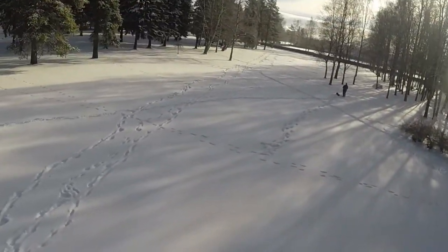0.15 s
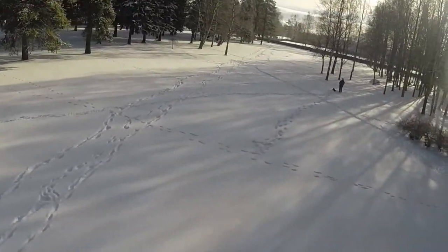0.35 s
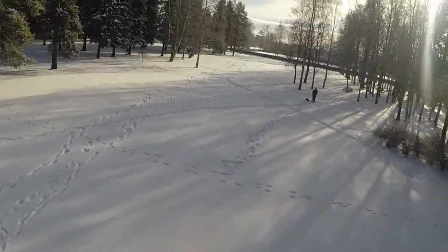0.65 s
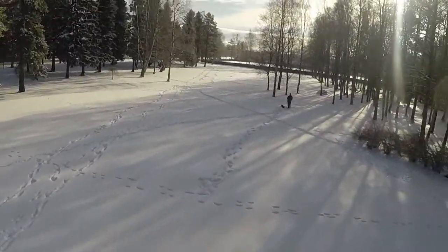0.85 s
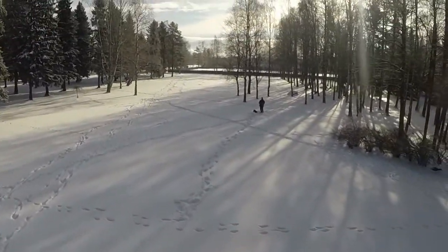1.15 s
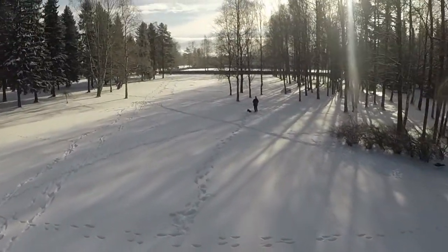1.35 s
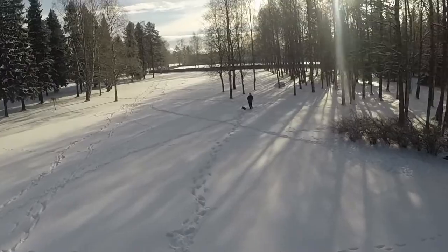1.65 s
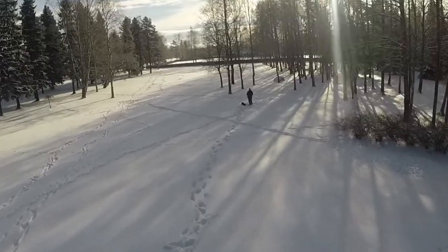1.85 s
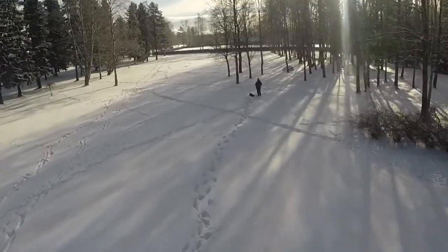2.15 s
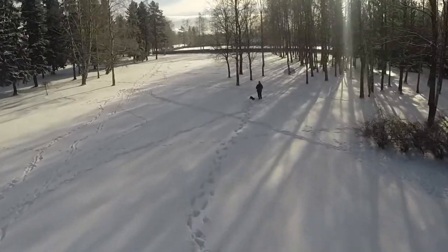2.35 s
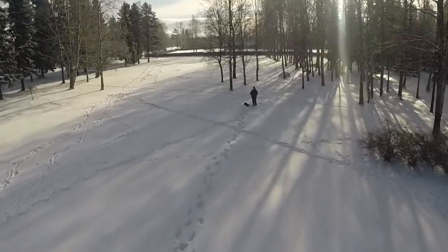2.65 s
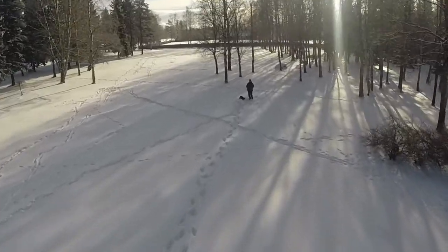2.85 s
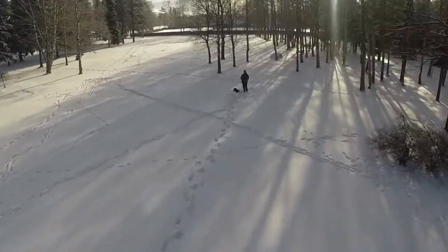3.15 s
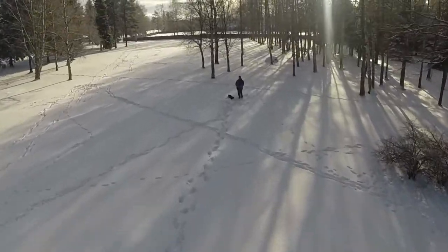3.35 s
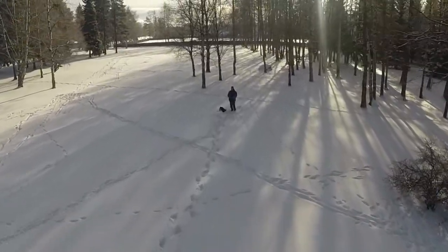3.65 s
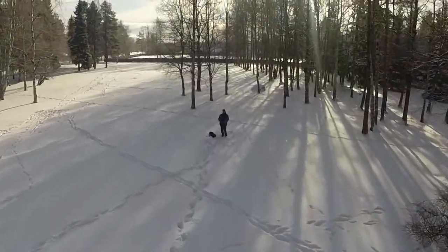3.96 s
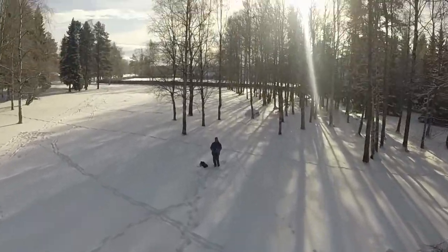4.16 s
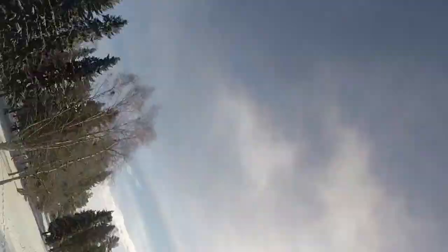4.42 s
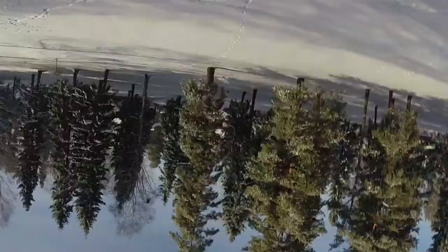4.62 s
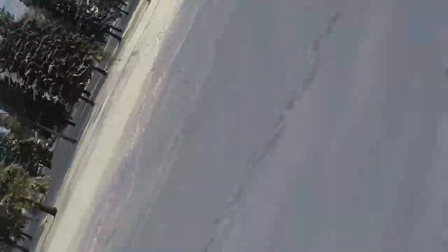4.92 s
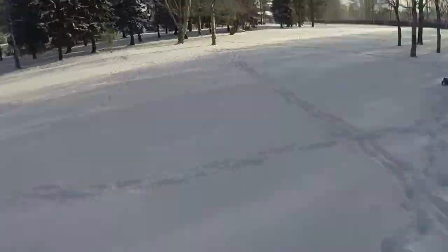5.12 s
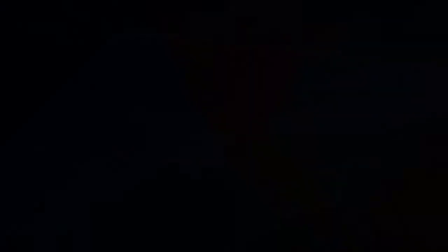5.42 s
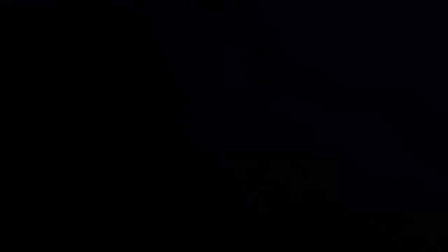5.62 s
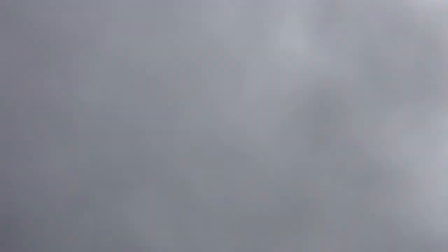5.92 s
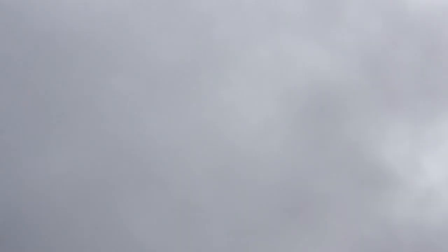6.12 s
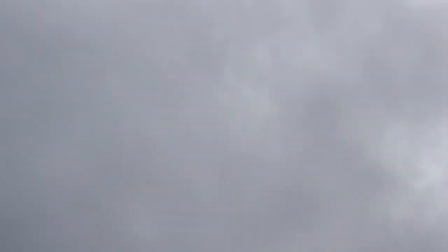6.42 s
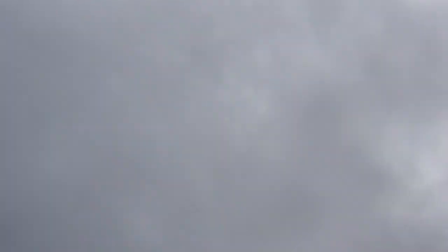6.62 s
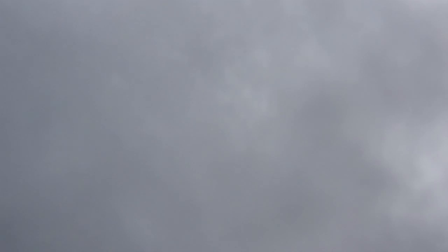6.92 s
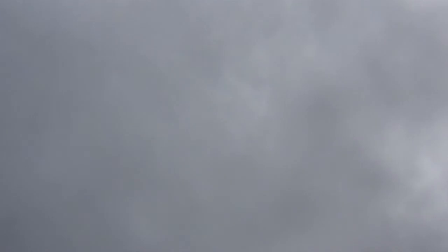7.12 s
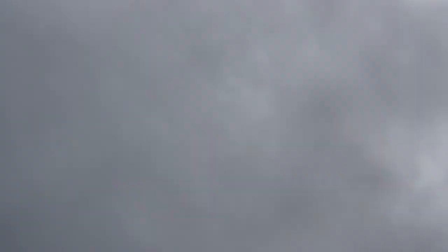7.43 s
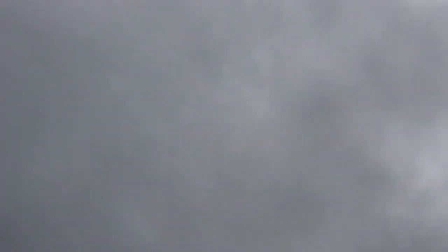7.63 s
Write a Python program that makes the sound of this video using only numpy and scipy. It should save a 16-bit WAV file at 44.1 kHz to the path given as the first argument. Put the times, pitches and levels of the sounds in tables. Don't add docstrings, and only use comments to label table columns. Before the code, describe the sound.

A loud four-rotor buzz cuts out, a blade rattles on the tumbling housing, then thump, snow crunch, a brief motor shudder and quiet hiss.

```python
import sys
import numpy as np
from scipy import signal
from scipy.fft import rfft, irfft, next_fast_len
from scipy.io import wavfile

SR = 44100
rng = np.random.default_rng(int(sys.argv[2]) if len(sys.argv) > 2 else 0)


def dump_mix(stems):
    frames = np.atleast_2d(stems).T
    limited = np.clip(frames, -1, 1)
    pcm = np.round(limited * 32767).astype(np.int16)
    wavfile.write(sys.argv[1], SR, pcm)


def rack_gain(trim_db):
    fader = np.asarray(trim_db, float)
    return 10 ** (fader / 20)


N = 343098
T = np.arange(N) / SR
POWERED = np.clip((4.38 - T) / 0.033, 0, 1)

# (time [s], hiss level [dB])
WASH = [(0, -29.5), (0.3, -28), (0.6, -29.5), (1.0, -28.5), (1.5, -31), (2.3, -33), (4.36, -35.5),
        (4.5, -39.5), (4.83, -55), (4.87, -51.5), (4.94, -59), (5.04, -57), (5.12, -57), (5.25, -58),
        (5.39, -60.5)]
# (time [s], peak [dB], panel ring [Hz], tick level [dB])
BLADE_STRIKES = [(4.5150, -15.5, 1135, -52), (4.5172, -15.5, 1102, -50), (4.5226, -10, 1190, -50.5),
                 (4.5410, -8, 1508, -39.5), (4.5455, -22.5, 1500, -40), (4.5500, -5.5, 1950, -37.5),
                 (4.5537, -16.5, 1910, -9), (4.5580, -1.5, 1947, -30), (4.5615, -17.5, 1893, -22.5),
                 (4.5771, -6.5, 1420, -34), (4.5825, -20.5, 1500, -35.5), (4.5858, 3, 1689, -30),
                 (4.5935, -10, 1710, -29), (4.6000, -16.5, 1390, -40.5), (4.6058, -5, 1720, -34.5),
                 (4.6147, -9, 1737, -34.5), (4.6250, -13.5, 1640, -26.5), (4.6295, -14, 1500, -30.5),
                 (4.6348, -9.5, 1650, -35.5), (4.6428, -12.5, 1416, -40.5), (4.6645, -4.5, 1500, -30.5),
                 (4.6768, 1, 1675, -32.5), (4.686, -19.5, 1450, -38), (4.6960, -8.5, 1443, -36.5),
                 (4.7069, -4, 1654, -36), (4.7190, -8.5, 1480, -34.5), (4.7367, -5.5, 1420, -33.5),
                 (4.7493, -2.5, 1500, -34.5), (4.7597, -6.5, 1500, -37), (4.7709, -5, 1527, -35),
                 (4.7893, -7, 1500, -33.5), (4.8009, -3.5, 1524, -35.5), (4.8121, -6, 1500, -38),
                 (4.8314, -6, 1500, -32.5)]


def in_time(rows, fade_s=0.035):
    s, *columns = np.transpose(rows)
    since_start = T - s[0] + (s[0] < .01)
    gate = np.clip(np.minimum(since_start, s[-1] - T) / fade_s + 1, 0, 1)
    return gate, [np.interp(T, s, c) for c in columns]


def lift_db(modes, hz):
    return sum(db / (1 + (2 * (hz - centre_hz) / width) ** 2) for centre_hz, width, db in modes)


def colour(x, spectrum, modes=()):
    size = next_fast_len(N)
    hz = np.maximum(np.fft.rfftfreq(size, 1 / SR), 1)
    points = np.array(spectrum)
    shape_db = np.interp(np.log(hz), np.log(points[:, 0]), points[:, 1], left=-90, right=-120)
    out = irfft(rfft(x, size) * rack_gain(shape_db + lift_db(modes, hz)), size)[:N]
    return out / out.std()


def drift(rate):
    r = np.exp(-80 * np.pi * rate / SR)
    slow = signal.lfilter([1], [1, -2 * r, r * r], rng.standard_normal(N // 40 + 2002))[2000:]
    return np.interp(np.arange(N) / 40, np.arange(len(slow)), slow / slow.std())


def ring(clicks, hz, t60):
    r, w = rack_gain(-60 / (t60 * SR)), 2 * np.pi * hz / SR
    return signal.lfilter([0, np.sin(w)], [1, -2 * r * np.cos(w), r * r], clicks + 1e-18)


def swell(s, db, rise, fade):
    return rack_gain(db - np.where(T < s, rise * (s - T), fade * (T - s)))


def preamp_hiss():
    # (frequency [Hz], density [dB per Hz])
    hiss_floor = [(20, -4), (60, 1), (150, -1.5), (400, -6.5), (1000, -12), (3000, -16.5), (6000, -22.5),
                  (8000, -26.5), (12000, -30), (15800, -56)]
    # (time [s], level [dB])
    gain_recovery = [(6.3, -7.5), (6.95, 1.3)]
    level_db = -62 + np.interp(T, *np.transpose(gain_recovery))
    return rack_gain(level_db) * colour(rng.standard_normal(N), hiss_floor)


def stall():
    # (time [s], level [dB])
    shudder = [(6.25, -55), (6.43, -45.5), (6.52, -30.5), (6.63, -35), (6.73, -48.5), (6.84, -44.5),
               (6.93, -50.5), (7.3, -62), (7.6, -75.5)]
    # (time [s], third overtone [dB], rattle [dB])
    shaft_catches = [
        (6.3, -60, -56),
        (6.42, -55, -62),
        (6.53, -44.5, -68),
        (6.68, -50, -51.5),
        (6.845, -47.5, -76),
    ]
    catch_db_per_s = 280
    gate, (db,) = in_time(shudder)
    phase = 2 * np.pi * 62 * T
    third = sum(swell(s, third_db, catch_db_per_s, catch_db_per_s) for s, third_db, _ in shaft_catches)
    rattle = sum(swell(s, rattle_db, catch_db_per_s, catch_db_per_s) for s, _, rattle_db in shaft_catches)
    rumble = colour(rng.standard_normal(N), [(20, -9), (40, 8), (130, 2), (260, -22), (500, -23.0)])
    tones = rack_gain(db) * (np.sin(phase) + 0.032 * np.sin(2 * phase) + 0.22 * rumble)
    tones += third * np.sin(2.95 * phase + drift(11))
    tones += rattle * np.sin(2 * np.pi * 288 * T + drift(8.2))
    return gate * np.sqrt(2) * tones


def snow():
    # (start [s], fullest [s], slowing [s], stop [s], crunch level [dB])
    snow_slides = [
        (5.47, 5.68, 5.8, 5.84, -35),
        (5.84, 5.875, 6.01, 6.1, -33),
        (6.03, 6.095, 6.122, 6.135, -46),
        (6.12, 6.155, 6.185, 6.2, -53),
        (6.17, 6.195, 6.22, 6.255, -52),
        (6.24, 6.29, 6.325, 6.36, -67),
        (6.36, 6.385, 6.41, 6.47, -68),
    ]
    # (from [s], to [s], level [dB])
    snow_crushes = [
        (5.405, 5.422, -45),
        (5.42, 5.426, -24),
        (5.427, 5.435, -13),
        (5.443, 5.455, -15),
        (5.457, 5.492, -45),
        (5.742, 5.769, -34),
        (5.76, 5.789, -25.5),
        (5.274, 5.303, -56.5),
    ]
    # (time [s], level [dB], fade [dB per s])
    digging_in = [
        (5.448, -15, 498),
        (5.5, -33, 150),
        (5.54, -29, 250),
        (5.58, -27.5, 62.5),
        (5.76, -31.5, 129),
        (6.13, -52, 46.5),
    ]
    # (frequency [Hz], density [dB per Hz])
    crunch_spectrum = [(700, -15), (900, -17), (1300, -5.5), (1700, 3.5), (2500, -2), (3300, -8),
                       (4000, -11), (4800, -20.5), (6000, -17.5), (7000, -22), (9000, -26.5), (12000, -25),
                       (15800, -74)]
    # (frequency [Hz], density [dB per Hz])
    rub_spectrum = [(8.8, -36.5), (15, -3.5), (123, -4.5), (183, 0), (276, -13), (333, -9.5), (567, -12.5),
                    (771, -31), (900, -33.5), (1170, -58), (1980, -120)]

    edge = -21
    sliding = 0
    for start, fullest, slowing, stop, db in snow_slides:
        shape_db = np.interp(T, [start, fullest, slowing, stop], [edge, 0, 0, edge], left=-99, right=-99)
        sliding = sliding + rack_gain(db + shape_db)
    digging = sum(swell(s, db, rise=650, fade=fade) for s, db, fade in digging_in)
    digging = digging * np.clip((6.5 - T) / .05, 0, 1)

    sizes = rack_gain(3.5 * np.minimum(rng.exponential(1, N), 4)) * rng.choice([-1, 1], N)
    breaks = sizes * (rng.random(N) < 5000 / SR)
    grains = colour(breaks + 0.12 * rng.standard_normal(N), crunch_spectrum,
                    [(2670, 230, 5.1), (4000, 600, 5.5), (5900, 1300, 11.0)])
    pressed = sum(rack_gain(db) * np.clip(np.minimum(T - a, b - T) / 0.0051, 0, 1) for a, b, db in snow_crushes)
    crunch = (sliding * rack_gain(0.04 + 1.8 * drift(60) + 0.6 * drift(10)) + pressed) * grains
    rub_gain = np.maximum(digging, sliding * rack_gain(2.5)) * rack_gain(drift(27))
    return crunch + rub_gain * colour(rng.standard_normal(N), rub_spectrum)


def thumps():
    # (time [s], level [dB], frequency [Hz], t60 [s], direction [sign])
    body_blows = [(5.411, -13, 130.4, .03, -1), (5.4173, -6, 172, 0.07, 1), (5.4306, 1.5, 131.8, 0.023, -1),
                  (5.4337, 11.5, 85.5, 0.016, 1), (5.4382, -4.5, 691, 0.013, 1),
                  (6.13, -35.5, 32.6, 0.59, -1), (5.587, -13, 247, .03, 1), (5.825, -13, 316, 0.041, -1),
                  (5.832, -17, 330, .03, 1), (5.777, -19, 402, .03, 1), (5.893, -23, 254, .06, 1),
                  (4.832, -29, 1870, .12, 1), (5.589, -15, 1450, .014, 1)]
    out, t = np.zeros(N), np.arange(int(.15 * SR)) / SR
    for s, db, hz, t60, direction in body_blows:
        i = int(s * SR)
        out[i:i + len(t)] += np.sign(direction) * rack_gain(db - 60 * t / t60) * np.sin(2 * np.pi * hz * t)
    return out


def knocks(rows, contact_ms, ring_ms, shell_db, chatter_ms, rough, longest_s, overtones, clean, sag):
    # (frequency [Hz], level [dB], t60 [s])
    shell_modes = [(596, -26.5, 0.018), (773, -25.5, 0.091), (1190, -14.5, .008), (1500, -8.5, 0.017),
                   (1880, -32, 0.1), (2100, -2, 0.0082), (2630, -7.5, 0.014), (3680, -20.5, 0.014),
                   (4364, -21, 0.0085), (5500, -35, 0.014), (7400, -31, 0.0079), (12300, -29, 0.003)]
    contact_s = .00004
    out, t = np.zeros(N), np.arange(int(.12 * SR)) / SR
    rise = 1 - np.exp(-(t / 0.0004) ** 2)
    shape = rise * np.where(t < contact_ms / 1000, 1, np.exp(-(t * 1000 - contact_ms) / ring_ms))
    clean_click = clean * np.exp(-((t - .0003) / contact_s) ** 2) / (1.9 * contact_s * SR)
    luck = rng.standard_normal((len(rows), len(shell_modes) + 1 + len(t)))
    for (s, db, hz, top_db), draw in zip(rows, luck):
        noise = draw[len(shell_modes):]
        panel = np.sin(2 * np.pi * hz * (t + sag * t * np.exp(-t / 0.0016)))
        second = np.sin(2 * np.pi * (2.3 + .08 * draw[2]) * hz * t + draw[0])
        third = np.sin(2 * np.pi * (3.4 + 0.18 * draw[3]) * hz * t + draw[1])
        panel += overtones * (second + 0.42 * third)
        panel *= 1 + rough * signal.lfilter([.2], [1, -.8], noise[1:])
        tick = np.diff(noise) * np.exp(-t / 0.0013)
        tick = rack_gain(top_db + 10.0) * signal.lfilter([.3], [1, -.7], tick)
        chatter = 0.18 * noise[1:] * np.exp(-1000 * t / chatter_ms) * (1 - np.clip(clean, 0, 1)) + clean_click
        shell = 0
        for (mode_hz, mode_db, t60), z in zip(shell_modes, draw):
            shell = shell + rack_gain(mode_db + shell_db + 2.7 * z) * ring(chatter, mode_hz, min(t60, longest_s))
        i = int(s * SR)
        out[i:i + len(t)] -= rack_gain(min(db, 3) + 2.0) * (shape * panel + tick + shell)
    return signal.sosfilt(signal.butter(2, 9000, fs=SR, output="sos"), out)


def cracks():
    # (time [s], peak [dB], panel ring [Hz], tick level [dB])
    plastic_cracks = [(5.4191, -9.5, 1560, -28), (5.4314, -9.5, 2035, -16), (5.4360, 4, 1350, -13),
                      (5.4715, -7, 1690, -21), (5.5060, -38, 1346, -13), (5.5233, -42.5, 2064, -22),
                      (5.5378, -34.5, 1620, -20.5), (5.5872, 6, 2205, -28), (5.8012, 10, 2540, -17),
                      (5.8119, -0.5, 2560, -31), (5.8248, -7.5, 3050, -20), (5.8315, -6.5, 3250, -9),
                      (5.8437, -21.5, 3386, -22.5), (6.0290, -32.5, 2360, -12), (5.8753, -26, 1930, -14),
                      (5.8967, -27.5, 1600, -6), (5.9446, -27, 2740, -14), (5.987, -31, 2700, -18),
                      (6.0848, -43, 5100, -17), (6.198, -47.5, 2690, -14), (6.261, -59.5, 5500, -11),
                      (6.339, -61.5, 4000, -7), (6.462, -61, 1800, -16), (5.093, -52, 2706, -20),
                      (5.114, -50.5, 2600, -16), (5.299, -50.5, 2900, -13.5), (6.8957, -43, 2290, -10),
                      (4.21, -28, 1400, -25), (4.3507, -28.5, 1815, -6), (4.357, -34, 2400, -7),
                      (4.367, -33.5, 2800, -10), (4.379, -29, 2080, -16), (4.44, -31, 1885, -21)]
    return knocks(plastic_cracks, contact_ms=0.83, ring_ms=0.66, shell_db=-6.0, chatter_ms=1.5, rough=1.0,
                  longest_s=0.013, overtones=0.33, clean=0.073, sag=0.27)


def blade_beats():
    return knocks(BLADE_STRIKES, contact_ms=0.8, ring_ms=0.9, shell_db=-2.0, chatter_ms=2.2, rough=.08,
                  longest_s=.11, overtones=.04, clean=.6, sag=.1)


def turbulence(near_phase, whine_phase):
    # (time [s], buffeting level [dB])
    wind_levels = [(0, -21.5), (.24, -18), (1.0, -24.5), (1.92, -30.5), (4.3, -31), (4.38, -24.5),
                   (4.69, -46), (5.05, -42.5), (5.2, -27), (5.39, -30.5)]
    # (frequency [Hz], density [dB per Hz])
    buffet_spectrum = [(7.1, -52), (12, -15.5), (48, 7.5), (70, -2), (91, -22), (150, -120)]
    # (frequency [Hz], density [dB per Hz])
    shake_spectrum = [(50, -23), (85, 1.5), (120, 8.5), (150, 4), (200, 2.5), (235, 3), (270, -31.5),
                      (310, 5.5), (420, -5.5), (480, -14.5), (560, -27.5), (900, -33.5)]
    # (frequency [Hz], density [dB per Hz])
    hiss_spectrum = [(430, -23), (500, -2.5), (560, -23), (1000, -15), (2050, -16.5), (3400, -12),
                     (3900, -21.5), (6500, -21), (6900, -29.5), (11000, -34.5), (14000, -44.5),
                     (15800, -71)]
    # (frequency [Hz], width [Hz], lift [dB])
    housing_modes = [(640, 79, 19), (790.3, 80, 17), (1031, 65, -10), (1190, 78, 10), (1619, 340, 17),
                     (2070, 100, -2), (2253, 47, 8.5), (2857, 660, 9.5), (4400, 140, -0.5), (5560, 840, 5),
                     (7440, 510, 7.5), (10100, 900, 2.5)]
    # (frequency [Hz], width [Hz], lift [dB])
    side_on_modes = [(1620, 500, -5), (2750, 400, 1.5), (5600, 1200, 5), (10000, 2000, 4)]

    white = rng.standard_normal((3, N))
    gate, (buffet_db,) = in_time(wind_levels)
    buffet = rack_gain(buffet_db - 4.5 + 0.9 * drift(6)) * colour(white[0], buffet_spectrum)

    first_s, last_s = BLADE_STRIKES[0][0], BLADE_STRIKES[-1][0]
    shake_db = -28.5 + 2.5 * np.clip((T - first_s) / 0.11, 0, 1)
    shake_db -= 4.5 * np.clip((T - last_s) / 0.064, 0, 1)
    shake_db -= 33.5 * np.maximum(T - last_s, 0)
    shake = rack_gain(shake_db + 3 + 1.4 * drift(5.2)) * colour(
        white[1], shake_spectrum, [(215, 16, 4.5), (300, 40, -3.0), (392, 20, 4.1)])

    chop = 1 + 0.24 * np.sin(near_phase) + 0.13 * np.sin(whine_phase) + 0.055 * np.sin(near_phase / 2)
    chopped = colour(white[2] * chop, hiss_spectrum, housing_modes)
    side_on = colour(white[2], hiss_spectrum, housing_modes + side_on_modes)
    hiss_db = np.interp(T, *np.transpose(WASH)) - 1.0 + 0.62 * drift(30) + 2.3 * drift(12) * (T > 4.87)
    hiss = rack_gain(hiss_db) * np.where(T < 4.87, chopped, side_on)
    return gate * (buffet + shake + hiss)


def motor_whine(whine_phase):
    # (time [s], level [dB])
    drive_levels = [(0.3, -32), (0.4, -18), (0.6, -19), (0.7, -36), (1.5, -31), (1.65, -23), (1.95, -25),
                    (2.1, -32), (2.35, -21), (2.9, -18), (3.2, -28), (4.2, -20)]
    poles = rack_gain(-23 + 2 * drift(4) - 10 * (T < 1.05)) * np.sin(42 * whine_phase + 1.5 * drift(8))
    drive_db = np.interp(T, *np.transpose(drive_levels)) + drift(3)
    drive = rack_gain(drive_db) * np.sin(2 * np.pi * 4545 * T + 25 * drift(1.5))
    return POWERED * rack_gain(np.interp(T, *np.transpose(WASH))) * (poles + drive)


def rotor(rows, start_turn, unbalance_db, trim_db, octave_db):
    # (frequency [Hz], level [dB])
    octave_path = [(140, -34.5), (200, -21.5), (230, -24), (256, -51), (284, -41), (305, -21.5),
                   (342, -24.5), (374, -18)]
    # (multiple of blade rate [ratio], level re blade tone [dB])
    upper_orders = [(1.5, -38.5), (2.5, -37), (3, -26), (4, -36.5), (5, -42)]
    # (frequency [Hz], width [Hz], lift [dB])
    frame_modes = [(399.5, 56, 15.5), (222, 17, 21), (516, 41, -10), (664, 38, 10), (811, 65, 17)]

    gate, (hz, blade_db) = in_time(rows)
    steady = 2 * np.pi * (start_turn + np.cumsum(hz) / SR)
    phase = steady + 2 * np.pi * np.cumsum(.15 * drift(6)) / SR
    octave_db = octave_db + np.interp(2 * hz, *np.transpose(octave_path))
    octave_db = octave_db - 31 * np.maximum(T - 4.45, 0)
    shaft_db = unbalance_db + 60 * np.log10(hz / 170) + 2.2 * drift(10.0) - 14 * (1 - POWERED)
    tones = rack_gain(blade_db) * np.sin(phase)
    tones += rack_gain(octave_db) * np.sin(2 * phase + 1)
    tones += rack_gain(shaft_db) * np.sin(phase / 2)
    unsteady_db = 3.73 * drift(12.0) * POWERED - 14 * np.clip(T - 4.6, 0, .5)
    for order, db in upper_orders:
        order_db = np.minimum(blade_db, -12 if order > 3 else 0) + db
        order_db = order_db + lift_db(frame_modes, order * hz) + unsteady_db
        tones += rack_gain(order_db) * np.sin(order * phase)
    return np.sqrt(2) * gate * rack_gain(trim_db + 0.4 * drift(6.4)) * tones, steady


def flight():
    # (time [s], blade rate [Hz], blade tone [dB])
    near_flying = [(0.0, 179.2, -17), (0.27, 182.5, -26), (0.47, 186.9, -28), (0.72, 180.2, -22.5),
                   (0.97, 177.8, -17.5), (1.17, 173, -13.5), (1.4, 175.5, -17), (1.82, 174.5, -17.5),
                   (2.1, 170.1, -13.5), (2.38, 172.4, -17), (2.62, 169.4, -15), (2.85, 170, -14.5),
                   (3.23, 171.8, -16), (3.42, 169.1, -16), (3.8, 170.8, -16), (3.95, 168.9, -16.5),
                   (4.24, 169.6, -16.5)]
    near_failing = [(4.341, 156.5, -8), (4.47, 126.8, -8.5), (4.62, 101, -32), (4.8, 95, -27),
                    (5.0, 80.8, -23), (5.2, 68.5, -57)]
    slow_flying = [(0.0, 152.5, -18), (0.2, 151.7, -19), (0.51, 143.5, -18.5), (0.68, 142.2, -16),
                   (0.8, 141, -21), (1.0, 141, -44), (1.1, 145.3, -28), (1.28, 150, -18),
                   (1.55, 148.5, -21.5), (1.87, 145.6, -21), (2.15, 149, -22.5), (2.4, 141.4, -19.5),
                   (2.9, 141.2, -19.5), (3.12, 142.8, -21), (3.45, 141.2, -20), (3.7, 141.4, -20.5),
                   (3.9, 142.7, -22.5), (4.17, 142.5, -22)]
    slow_failing = [(4.3, 130.1, -27.5), (4.46, 127.9, -12.5), (4.52, 133.1, -10), (4.62, 144, -25.5),
                    (4.85, 131, -34), (4.949, 116.4, -45), (5.06, 95.4, -29), (5.25, 72, -24.5),
                    (5.39, 54.1, -24.5)]
    whining_flying = [(0.0, 132.9, -21.5), (0.3, 133.1, -20), (0.58, 129.5, -18.5), (0.78, 139, -16),
                      (1.0, 142.7, -13), (1.15, 154.6, -15), (1.3, 155.5, -19.5), (1.78, 155, -17),
                      (1.92, 151.7, -17.5), (2.06, 154.4, -17.5), (2.22, 148.6, -18.5), (2.42, 146.4, -31),
                      (2.62, 148.6, -18.5), (2.85, 151.1, -17.5), (3.23, 147.7, -21.5), (3.65, 154, -16),
                      (3.87, 151.8, -20), (4.2, 154, -18)]
    whining_failing = [(4.277, 148.4, -48.5), (4.45, 141.2, -35), (4.62, 148.9, -32), (4.73, 170.6, -40),
                       (4.89, 147.8, -19.5), (4.97, 131.5, -41), (5.14, 166.7, -33.5), (5.24, 149.1, -57)]

    near, near_phase = rotor(near_flying + near_failing, start_turn=0.087, unbalance_db=-27.5,
                             trim_db=-0.07, octave_db=1.86)
    slow, _ = rotor(slow_flying + slow_failing, start_turn=.4, unbalance_db=-31.5,
                    trim_db=0.1, octave_db=-4.0 + 22.0 * (T > 5.21))
    whining, whine_phase = rotor(whining_flying + whining_failing, start_turn=.7, unbalance_db=-27.5,
                                 trim_db=-0.7, octave_db=-12.5 + 12.0 * (T > 4.56) * (T < 4.9))
    return near + slow + whining + turbulence(near_phase, whine_phase) + motor_whine(whine_phase)


def scene():
    crash = thumps() + cracks() + blade_beats()
    return (preamp_hiss() + stall() + snow() + crash + flight())[None]


def roll_off(x):
    return signal.sosfilt(signal.butter(12, 15800, fs=SR, output="sos"), x)


def record(dry):
    low = signal.sosfilt(signal.butter(2, 220, fs=SR, output="sos"), dry)
    bent = dry + .2 * signal.sosfilt(signal.butter(2, 30, "high", fs=SR, output="sos"), low ** 2)
    full = .98 * np.tanh((np.abs(bent) / .98) ** 3) ** (1 / 3) * np.sign(bent)
    full = signal.sosfilt(signal.cheby2(8, 40, 15600, fs=SR, output="sos"), full)
    return roll_off(full)


dry = scene()
out = record(dry)
dump_mix(out)
```